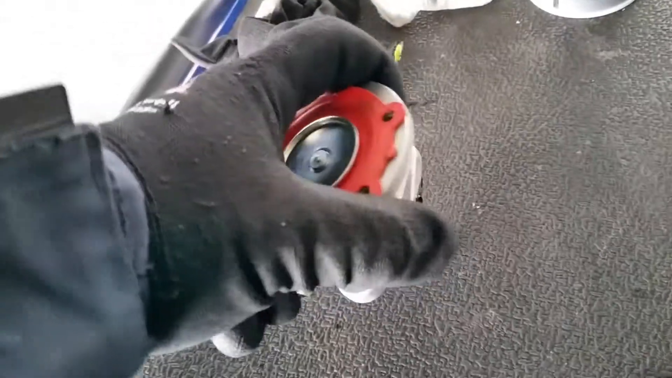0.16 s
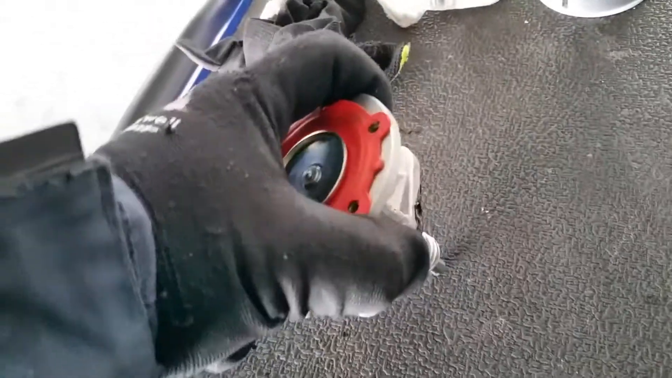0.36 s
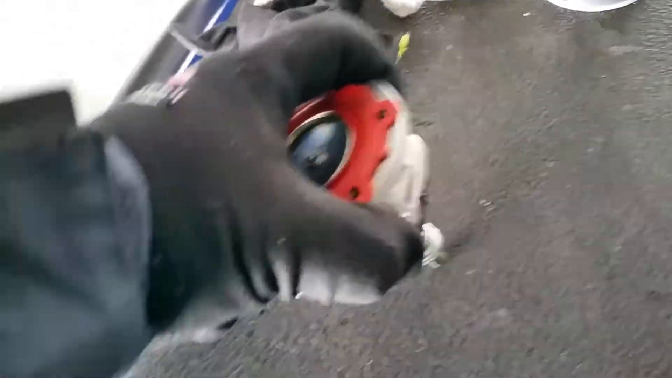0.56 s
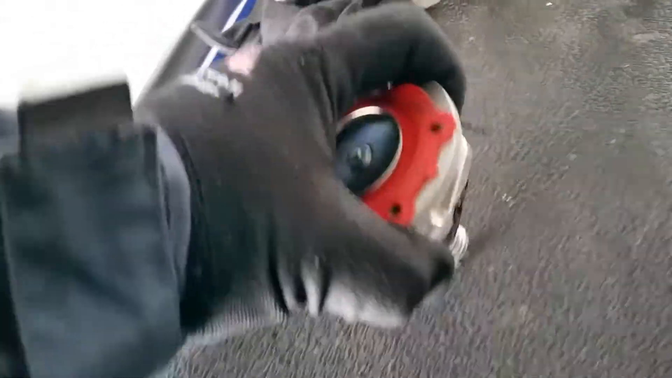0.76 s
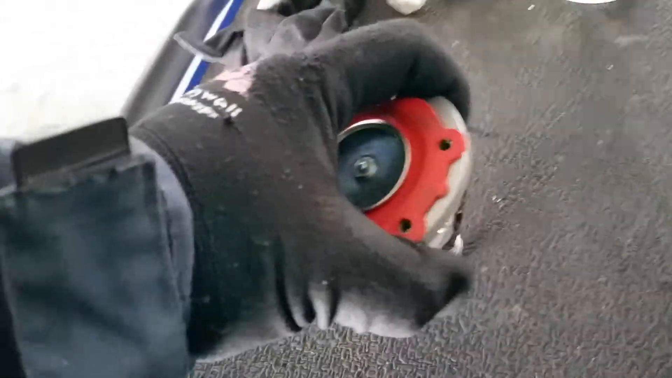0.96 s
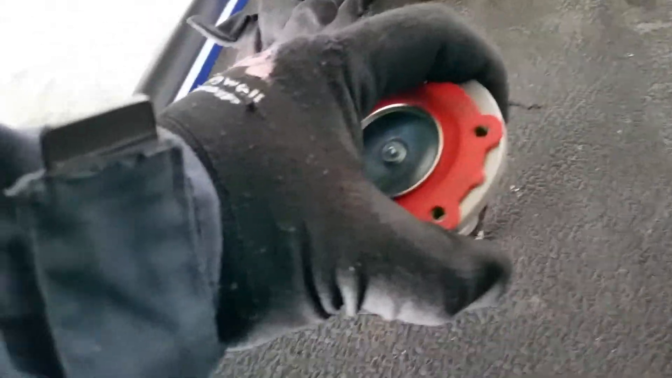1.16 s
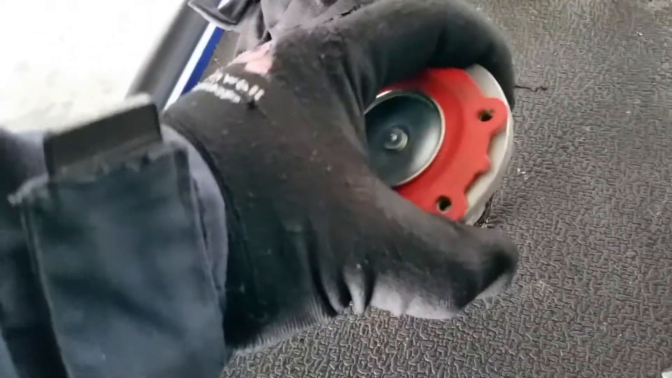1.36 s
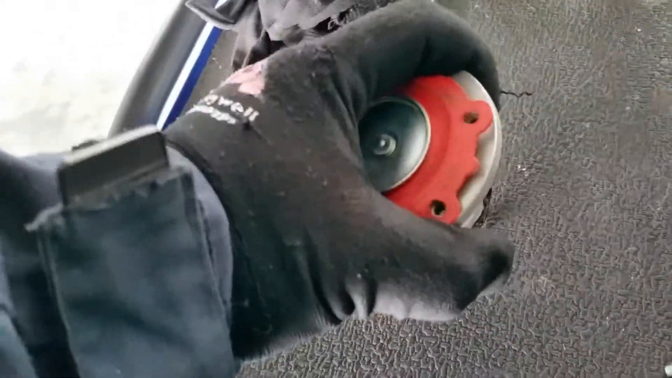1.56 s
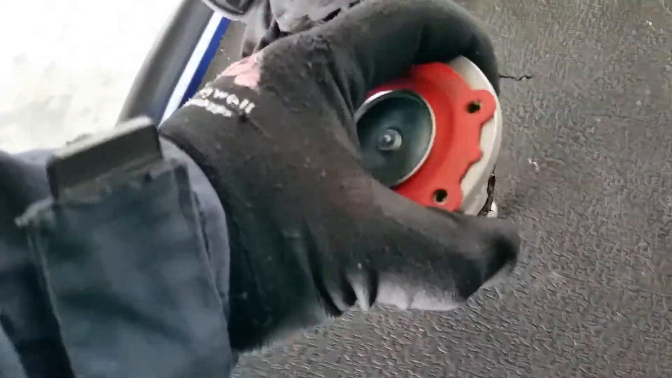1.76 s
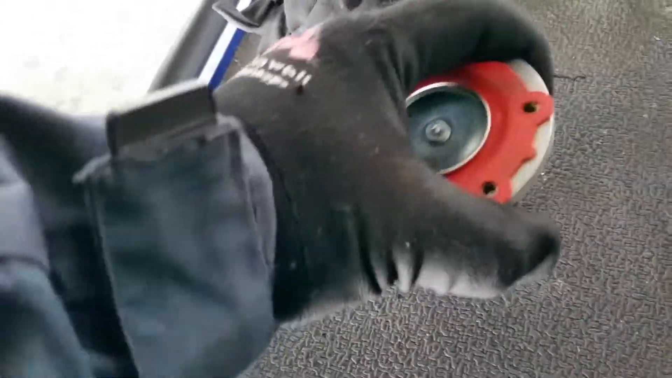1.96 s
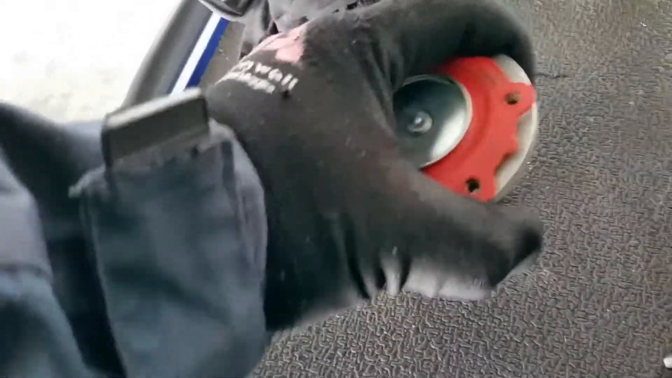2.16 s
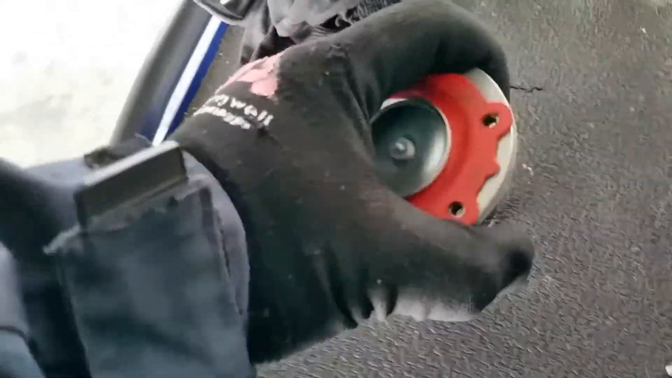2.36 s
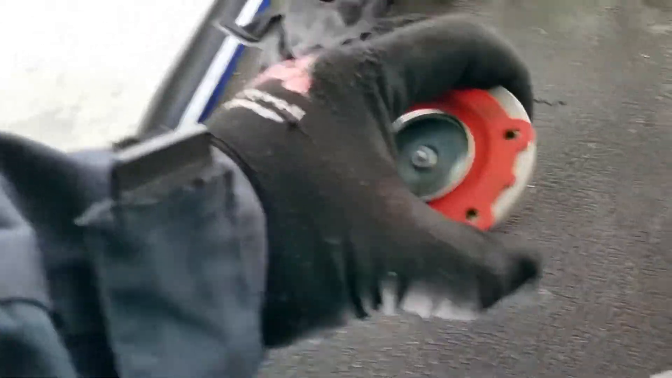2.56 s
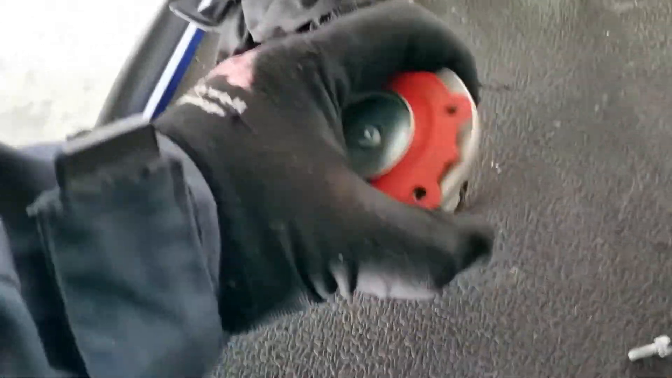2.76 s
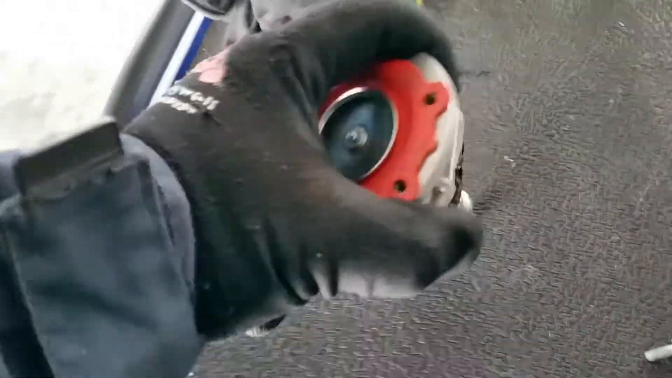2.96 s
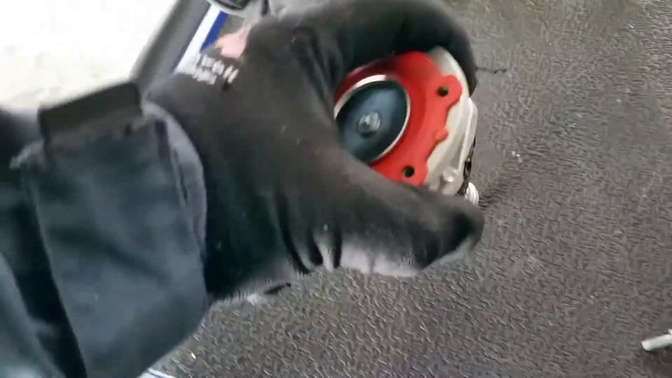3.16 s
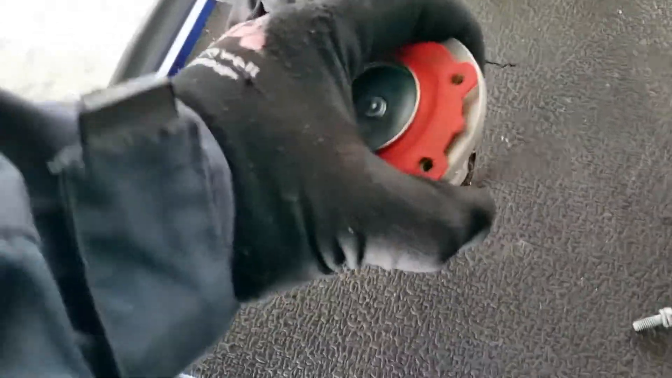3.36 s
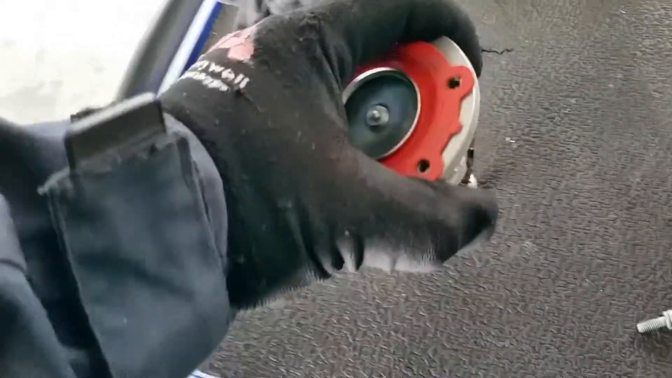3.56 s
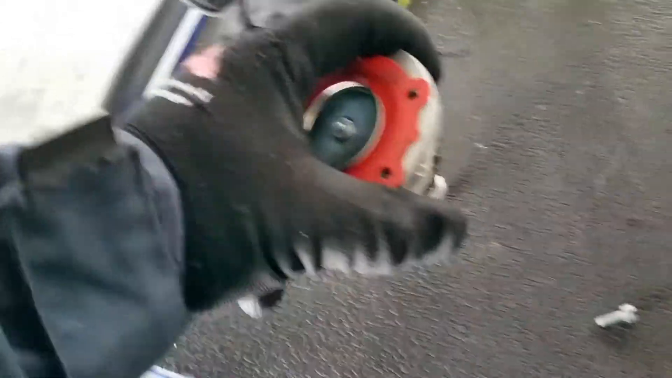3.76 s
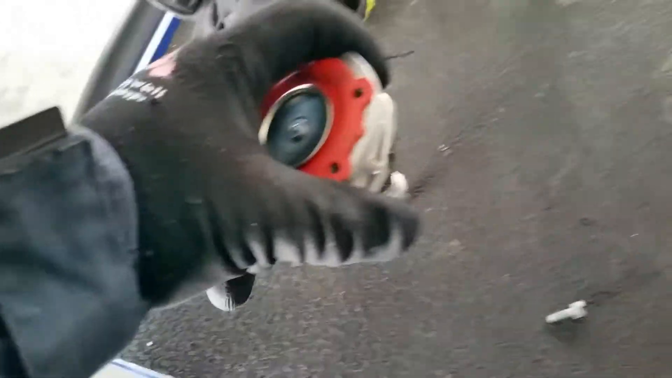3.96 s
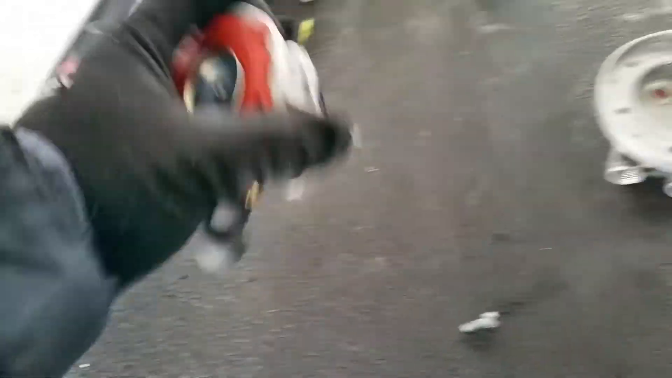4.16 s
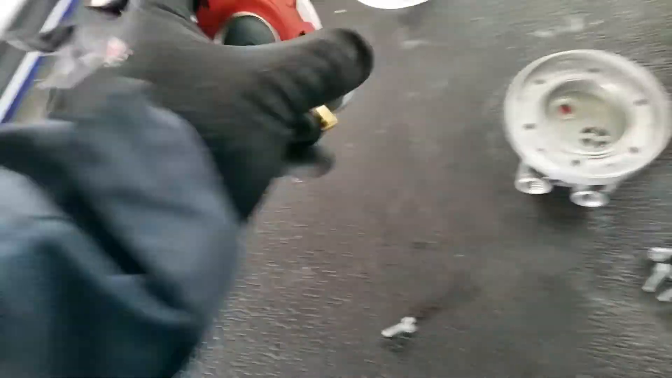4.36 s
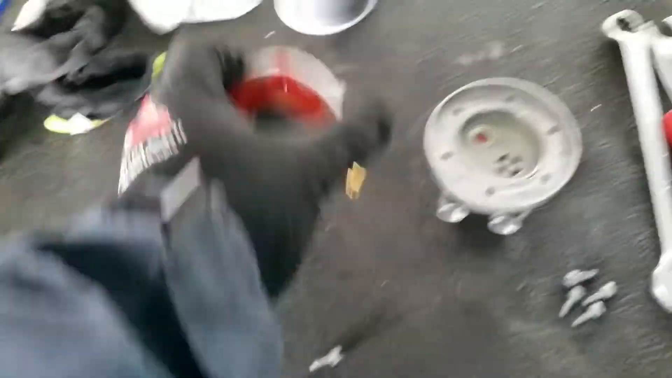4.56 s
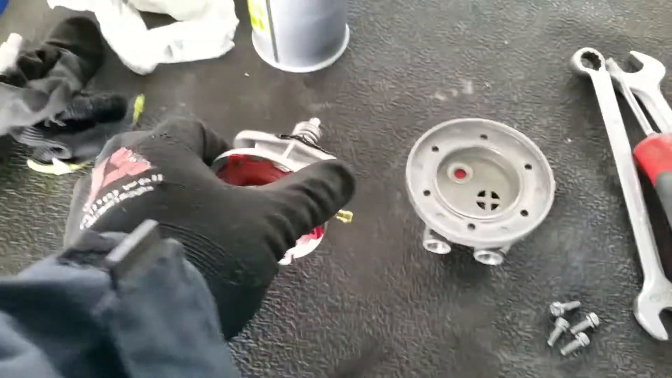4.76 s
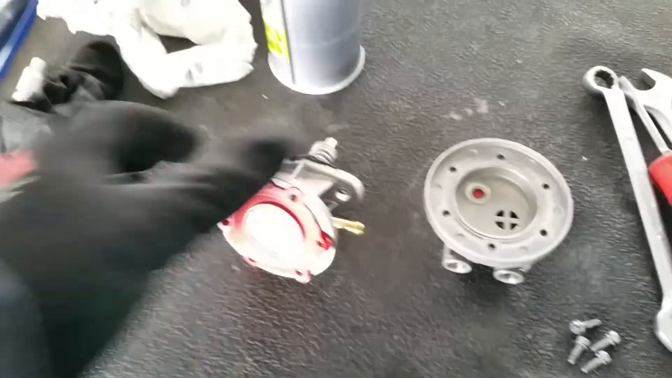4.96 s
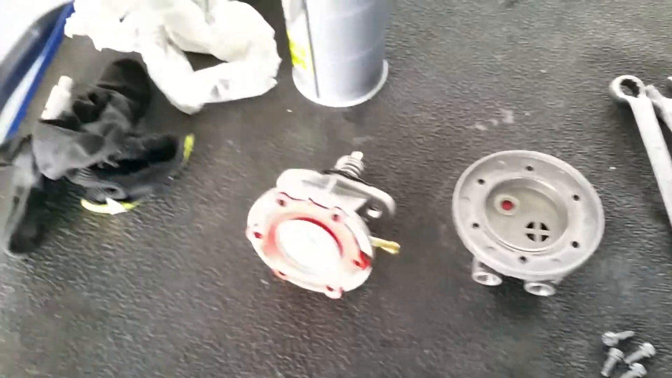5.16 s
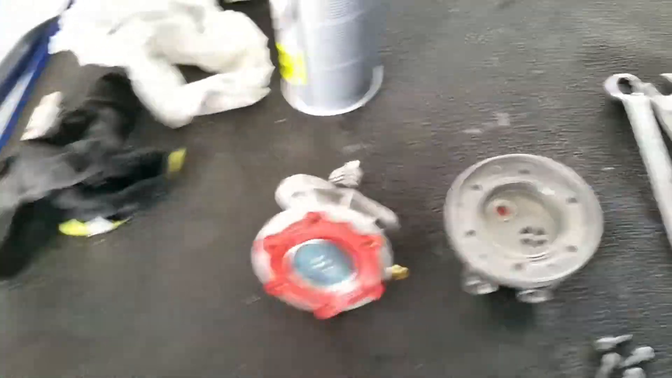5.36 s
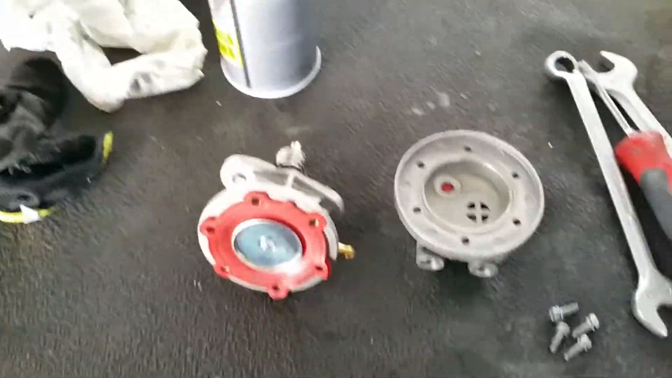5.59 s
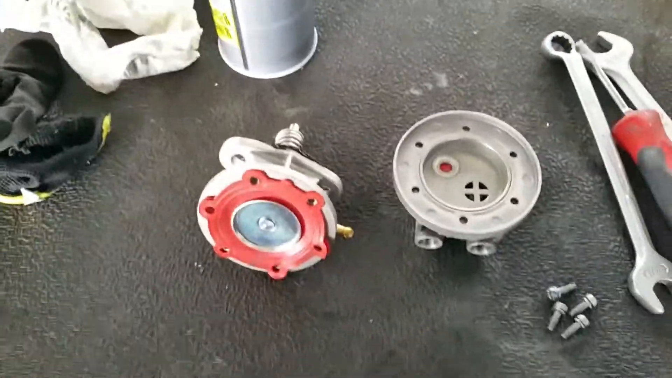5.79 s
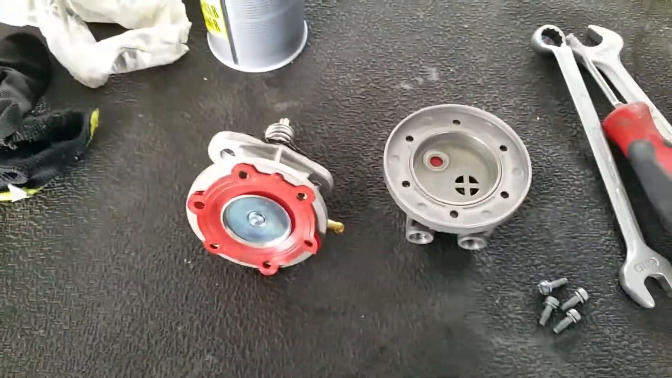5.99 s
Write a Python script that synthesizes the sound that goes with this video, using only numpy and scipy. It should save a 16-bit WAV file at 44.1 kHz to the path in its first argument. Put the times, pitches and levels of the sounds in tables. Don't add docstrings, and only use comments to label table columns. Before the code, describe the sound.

Close nylon sleeve rustle and four dull metallic thumps on a padded bench, then a heavier clunk with clicking parts; an engine idles outside.

```python
import sys
import numpy as np
from scipy import signal
from scipy.fft import rfft, irfft, next_fast_len
from scipy.io import wavfile
from scipy.ndimage import uniform_filter1d

SR = 44100
rng = np.random.default_rng(int(sys.argv[2]) if len(sys.argv) > 2 else 0)


def magnitude_from_level(level_db):
    exponent = np.asarray(level_db, float) / 20
    return 10 ** exponent


def put_to_file(sound):
    columns = np.atleast_2d(sound).T
    safe = np.clip(columns, -1, 1)
    whole_steps = np.round(safe * 32767)
    wavfile.write(sys.argv[1], SR, whole_steps.astype(np.int16))


N = 265778
TIME = np.arange(N) / SR
SIZE = next_fast_len(N)
HZ = np.arange(SIZE // 2 + 1) * SR / SIZE + 1e-3

# f/Hz, likeness/0-1
PORTS_ALIKE = [(30, 0.66), (130, 0.74), (290, 0.77), (640, 0.4), (1410, 0)]


def on_log(table, hz):
    return np.interp(np.log(hz), np.log([p[0] for p in table]), [p[1] for p in table])


def curves(table):
    s, *columns = np.transpose(table)
    return [np.interp(TIME, s, c) for c in columns]


def walk(rate):
    hold = int(SR / rate)
    steps = np.repeat(rng.standard_normal(N // hold + 1), hold)
    return uniform_filter1d(steps, hold)[:N]


def hiss(left, right, alike, flicker_db, rate):
    a, b = rfft(rng.standard_normal((2, SIZE)))
    shared = np.clip(on_log(alike, HZ), 0, 1)
    other = shared * a + np.sqrt(1 - shared ** 2) * b
    inside = (HZ > left[0][0]) & (HZ < left[-1][0])
    pair = np.array([a * magnitude_from_level(on_log(left, HZ)), other * magnitude_from_level(on_log(right, HZ))]) * inside
    out, octave = 0, np.log2(HZ)
    for k in range(int(np.log2(left[0][0])), int(np.log2(left[-1][0])) + 2):
        share = np.cos(np.pi / 2 * np.clip(octave - k, -1, 1)) ** 2
        out = out + irfft(pair * share, SIZE)[:, :N] * magnitude_from_level(flicker_db * walk(rate))
    return out / np.sqrt(np.mean(out ** 2))


def pan(x, db):
    return x * magnitude_from_level(np.array([db / 2, -db / 2]).reshape(2, -1))


def ports(x, lag):
    return np.array([x, np.roll(x, lag)])


def from_bench(x):
    return pan(ports(x, 5), -1.9)


def add(out, sound, s):
    i = int(s * SR)
    n = min(sound.shape[-1], N - i)
    out[..., i:i + n] += sound[..., :n]


def decay(t, t60):
    return np.exp(-np.log(1000) * t / t60)


def swell(start, length):
    share = (TIME - start) / length
    rise = 0.35
    speed = np.clip(np.minimum(share / rise, (1 - share) / (1 - rise)), 0, 1)
    return np.sin(np.pi / 2 * speed) ** 1.07


def ring(modes):
    t = TIME[:SR // 2]
    return sum(magnitude_from_level(db) * decay(t, t60) * np.sin(2 * np.pi * hz * t + round(ahead) * np.pi / 2)
               for hz, db, t60, ahead in modes)


def varied(modes, hz_share, spread_db):
    return [(hz * (1 + hz_share * rng.standard_normal()), db + spread_db * rng.standard_normal(), t60, ahead)
            for hz, db, t60, ahead in modes]


def push(x, contact_s):
    shape = np.hanning(int(contact_s * SR) + 2)
    return signal.fftconvolve(x, shape / shape.sum())[:len(x)]


def tick(db, hz, t60):
    t = TIME[:SR // 4]
    band = signal.butter(2, [hz / 2, min(hz * 2, .45 * SR)], "bandpass", fs=SR, output="sos")
    left, other = rng.standard_normal((2, len(t)))
    alike = np.clip(1 - hz / 2480, 0, 1)
    right = alike * left + np.sqrt(1 - alike ** 2) * other
    return magnitude_from_level(db) * signal.sosfilt(band, np.array([left, right]) * decay(t, t60))


def engine():
    # t/s, firing rate f/Hz, level/dB
    idle = [(0.0, 53.06, -46.5), (1.0, 52.4, -47.5), (1.6, 52.2, -46.5), (1.9, 47.36, -51),
            (2.5, 46.17, -54.5), (3.3, 44.13, -53), (4.0, 44.63, -52), (4.5, 46.12, -57), (5.2, 46.4, -50),
            (6.03, 46.86, -48.5)]
    # f/Hz, level/dB
    exhaust = [(44, -3), (53, 0), (88, -5), (105, -2), (140, -1), (158, -8.5), (200, -16), (320, -14)]
    hz, db = curves(idle)
    turn = 2 * np.pi * np.cumsum(hz * (1 + 0.00755 * walk(12))) / SR
    out = 0
    for k in range(1, 7):
        level = magnitude_from_level(db + on_log(exhaust, k * hz) + 5.0 * walk(11))
        out = out + np.sqrt(2) * level * np.sin(k * turn + rng.uniform(0, 2 * np.pi))
    return ports(out, 17)


def traffic():
    # t/s, low band level/dB,
    # # tyre hiss level/dB
    rumble_and_hiss = [(0.0, -48.5, 0.5), (0.45, -50.5, -3), (0.85, -49.5, 3), (1.4, -45, -0.5), (1.9, -46.5, 4.5),
                       (2.4, -50, 0), (2.85, -50.5, -3), (3.3, -48, 0), (3.9, -50, -2.5), (4.15, -50, 3),
                       (4.8, -41.5, 3), (5.7, -51, 3), (6.03, -50, 0)]
    # f/Hz, level/dB per Hz
    rumble = [(12, -46), (20, -8), (38, -5), (59, -3.5), (76, -2), (101, -1.5), (130, -6), (160, -7),
              (303, -12), (340, -15), (925, -25), (1310, -29.5), (2000, -45.5), (2600, -53), (4400, -120)]
    # f/Hz, level/dB per Hz
    air_left = [(700, -36), (1500, -1.5), (2500, 3), (3300, 1), (4600, 0.5), (5300, -42), (7500, -46),
                (9000, -21.5), (12000, -15), (14700, -3), (15800, -15)]
    air_right = [(700, 9.5), (1500, 5), (2200, 5.5), (3000, 0.5), (4500, -5.5), (5300, -9.5), (7800, -54),
                 (10000, -24), (13000, -9), (15800, 3)]
    rumble_db, air_db = curves(rumble_and_hiss)
    out = magnitude_from_level(rumble_db + 4.5) * hiss(rumble, rumble, PORTS_ALIKE, flicker_db=-2.5, rate=11)
    return out + magnitude_from_level(air_db - 58) * hiss(air_left, air_right, PORTS_ALIKE, flicker_db=2.2, rate=6)


def fan():
    # f/Hz, width/Hz, level/dB, left minus right/dB
    whines = [
        (3944, 670, -63.5, 10),
        (3827, 30, -79, 26.5),
        (14700, 300, -74, 17),
    ]
    out = np.zeros((2, N))
    for hz, width, db, side_db in whines:
        resonance = 1 / (1 + ((HZ - hz) / width * 2) ** 2)
        whine = irfft(rfft(rng.standard_normal((2, SIZE))) * resonance, SIZE)[:, :N]
        out += pan(magnitude_from_level(db) * whine / whine.std(), side_db)
    return out


def grip():
    # start t/s, length/s, level/dB
    shifts = [(0, .25, -44), (.45, 0.18, -44.5), (1.0, 0.37, -52), (1.8, 0.18, -49), (2.305, 0.42, -37),
              (2.8, 0.24, -39), (3.048, 0.23, -37.5), (4.15, 0.3, -52), (5.75, 0.25, -54)]
    # f/Hz, level/dB per Hz
    case = [(20, -10), (60, 5), (110, 2), (200, -17), (400, -36)]
    effort = np.sqrt(sum((magnitude_from_level(db) * swell(start, length)) ** 2 for start, length, db in shifts))
    return effort * hiss(case, case, [(20, 0), (400, 0)], flicker_db=-3.0, rate=27)


def cuff():
    # start t/s, length/s, level/dB, centre f/Hz
    rubs = [(-.2, 0.63, -58, 2140), (.55, 0.67, -68, 2400), (0.846, 0.17, -56, 2400),
            (0.98, 0.1, -55, 2750), (1.25, 0.52, -59, 2190), (1.502, 0.38, -57.5, 2200),
            (1.806, 0.27, -62, 2360), (2.44, 0.32, -60.5, 2240), (3.2, 0.34, -57.5, 2200),
            (3.604, 0.21, -61, 2000), (4.02, 0.64, -56, 2100), (4.25, 0.79, -56, 2240),
            (4.896, 0.63, -51.5, 2190), (5.343, 0.43, -59.5, 2250), (5.62, 0.66, -60, 2130),
            (5.62, 0.58, -62.5, 2750)]
    # share of its centre f, level/dB per Hz
    colour = [(.64, -20), (.84, -10), (1, 0), (1.18, -10), (1.6, -22), (2.05, -9), (2.36, -24)]
    out, noise = 0, rfft(rng.standard_normal((2, SIZE)))
    for start, length, db, hz in rubs:
        inside = (HZ > colour[0][0] * hz) & (HZ < colour[-1][0] * hz)
        drag = irfft(noise * magnitude_from_level(on_log(colour, HZ / hz)) * inside, SIZE)[:, :N]
        out = out + magnitude_from_level(db) * swell(start, length) * drag / drag.std()
    return pan(magnitude_from_level(-2.5 + 1.5 * walk(120) + 1.1 * walk(30)) * out, -8.0)


def sleeve():
    # start t/s, length/s, level/dB, fine fibres over body/dB, left minus right/dB
    strokes = [(-.2, 0.92, -77.5, 18.5, -2.5), (0.496, 0.59, -76.5, 13, -9), (0.805, 0.32, -60, 8, -6),
               (0.944, 0.26, -59.5, -17, -8.5), (1.087, 0.66, -69, -16, -9.5), (1.55, 0.29, -65, 2, -3),
               (1.77, 0.38, -69.5, 13, -7), (1.977, 0.26, -60, -13, -4), (2.17, 0.47, -65.5, 0, -1),
               (2.44, 0.27, -76, 17, -14.5), (3.002, 0.2, -74.5, 18.5, -12),
               (3.2, 0.58, -73.5, 14.5, -11.5), (3.598, 0.28, -69, 15.5, -4.5),
               (3.795, 0.51, -78, 19, -1.5), (4.04, 0.35, -58.5, 8.5, -4), (4.273, 0.52, -49.5, 7.5, -4),
               (4.668, 0.2, -49, -20, -6), (4.759, 0.5, -58, -6, -6), (4.94, 0.43, -53, 10.5, -10.5),
               (5.155, 0.62, -55.5, 12, -6.5), (5.648, 0.44, -66, 3, -1.5)]
    # f/Hz, level/dB per Hz
    rustle_left = [(1200, 2.5), (2500, -0.5), (4200, -1), (5500, -13), (7000, -11), (8500, -2), (9500, 1.5),
                   (11000, -2), (15000, -3), (15900, 5.5)]
    rustle_right = [(1200, -3), (2700, -3.5), (4500, -1.5), (6500, -5), (8000, -12), (9500, -10.5),
                    (11000, -8), (15000, -4), (15900, -1.5)]
    slips = magnitude_from_level(1.6 * walk(60) + 1.3 * walk(14))
    cloth = slips * hiss(rustle_left, rustle_right, PORTS_ALIKE, flicker_db=.9, rate=14)
    fine = signal.sosfilt(signal.butter(2, 11000, "highpass", fs=SR, output="sos"), cloth)
    body = signal.sosfilt(signal.butter(2, 11000, "lowpass", fs=SR, output="sos"), cloth)
    body_power, fine_power = magnitude_from_level(2 * -76.5), magnitude_from_level(2 * -74.5)
    for start, length, db, fine_db, side_db in strokes:
        power = pan(magnitude_from_level(db) * swell(start, length), side_db) ** 2
        body_power = body_power + power
        fine_power = fine_power + magnitude_from_level(2 * fine_db) * power
    return magnitude_from_level(2) * np.sqrt(body_power) * body - np.sqrt(fine_power) * fine


def loose_parts():
    # start t/s, level/dB,
    # centre f/Hz, t60/s, left minus right/dB
    clicks = [(2.402, -39, 1000, 0.018, -6), (2.549, -39, 1490, 0.016, -14), (2.93, -63, 2200, .01, 0),
              (4.7009, -34, 9000, 0.0089, 7), (3.438, -37.5, 1380, 0.016, -7),
              (3.636, -52, 1800, 0.011, -3), (4.889, -50, 8850, 0.0054, -13),
              (5.481, -29.5, 850, 0.022, -4),
              (.5505, -34, 900, .01, 0), (.5505, -41, 2800, .007, -3), (1.061, -44, 3500, .006, -5),
             (4.7004, -19, 1150, .016, 0), (4.7006, -33, 900, .12, 0), (4.73, -23, 480, .45, 0),
             (4.7131, -27, 6500, .014, 5), (4.7131, -28, 4200, .018, -3), (4.7131, -19, 2300, .024, -6),
             (4.7131, -27, 1100, .03, 0), (4.718, -33, 2600, .08, 0), (4.731, -30, 2100, .03, -3),
             (4.744, -38, 1500, .04, -3)]
    out = np.zeros((2, N))
    for s, db, hz, t60, side_db in clicks:
        add(out, pan(tick(db, hz, t60), side_db), s)
    return out


def snaps():
    # t/s, peak level/dB, centre
    # f/Hz, left minus right/dB
    short_cracks = [(1.0604, -50, 6000, -3), (1.4047, -55, 6200, -1), (1.8245, -50, 13000, -7),
                    (2.0368, -44, 13500, 0), (2.2716, -51, 9000, -4), (2.3204, -48, 7500, -5),
                    (2.3204, -45, 14500, -5), (2.5491, -52, 14000, -7), (2.621, -48, 13500, -5),
                    (2.7818, -55, 8000, -2), (2.7818, -50, 14000, -2), (3.581, -52, 14000, -5),
                    (.5515, -47, 1100, -2), (.5515, -47, 3000, -2), (4.7133, -26, 9500, 6),
             (4.7152, -27, 10500, 6), (4.7195, -35, 10000, 5), (4.726, -41, 10500, 5),
             (4.7325, -36, 4500, -2), (4.7325, -43, 10000, 3)]
    out, t = np.zeros((2, N)), TIME[:SR // 20]
    half_width = 2 ** .5
    for s, db, hz, side_db in short_cracks:
        edges = [hz / half_width, min(hz * half_width, .4 * SR)]
        band = signal.butter(2, edges, "bandpass", fs=SR, output="sos")
        crack = signal.sosfilt(band, rng.standard_normal(len(t)) * decay(t, .008))
        add(out, pan(magnitude_from_level(db + 2) * crack / np.abs(crack).max(), side_db), s)
    return out


def squeaks():
    # start t/s, end t/s, f/Hz, level/dB
    tones = [(.65, .76, 1500, -70), (1.30, 1.40, 2120, -68), (1.895, 1.97, 2650, -61),
             (2.01, 2.08, 2655, -62), (2.08, 2.11, 2640, -67), (2.105, 2.225, 2645, -67),
             (1.95, 2.07, 3055, -69), (2.04, 2.22, 3065, -61.5), (2.2, 2.26, 3065, -71),
             (2.27, 2.33, 3065, -72), (2.0, 2.13, 1535, -69), (2.0, 2.09, 2790, -71),
             (1.97, 2.02, 2680, -70), (2.16, 2.26, 1530, -69), (2.23, 2.29, 1730, -73),
             (5.84, 5.95, 1520, -67)]
    out = np.zeros((2, N))
    for start, end, hz, db in tones:
        n = int((end - start) * SR)
        flutter = magnitude_from_level(2.2 * walk(45)[:n])
        turn = 2 * np.pi * np.cumsum(hz * (1 + .004 * walk(40)[:n])) / SR
        add(out, pan(magnitude_from_level(db) * flutter * signal.windows.tukey(n, .45) * np.sin(turn), -18.5), start)
    return out


def knocks():
    # t/s, level/dB, f/Hz, t60/s
    soft_knocks = [(1.06, -37.5, 308, 0.14), (1.255, -40, 260, 0.071), (1.369, -37, 418, 0.044),
                   (1.278, -33, 293, 0.05), (1.311, -30, 256, 0.094), (1.348, -30, 215, 0.051),
                   (1.441, -31, 253, 0.044), (2.401, -31, 497, 0.0091), (2.412, -31, 198, 0.031),
                   (2.5495, -24, 456, 0.012), (3.009, -50, 297, .03), (3.387, -27.5, 400, 0.013),
                   (3.513, -30.5, 337, 0.026), (4.267, -23, 400, 0.011), (5.4802, -21.5, 735, 0.0067),
                   (5.767, -32.5, 404, 0.031),
                   (3.642, -29.5, 188, 0.28), (4.694, -18, 150, .05), (4.736, -16.5, 266, 0.16),
             (4.652, -25.5, 135, 0.073), (4.774, -19.5, 140, .08), (4.824, -23.5, 140, 0.063),
             (4.725, -24, 385, 0.077), (4.845, -33, 370, .1), (4.744, -26, 330, 0.14),
             (4.746, -25, 670, 0.16), (4.775, -27, 730, .06), (4.799, -26, 88, .1),
             (4.835, -34, 710, 0.052), (4.91, -37, 570, .08), (4.965, -38, 560, 0.096),
             (4.959, -34.5, 135, 0.17), (4.871, -26.5, 136.7, 0.32), (4.886, -27, 134, .2),
             (5.439, -22, 137, 0.094), (5.4616, -39, 135, 0.094), (5.468, -27, 124.2, 0.07)]
    out = np.zeros(N)
    for s, db, hz, t60 in soft_knocks:
        add(out, push(ring([(hz, db, t60, 0)]), 0.0016), s)
    return from_bench(out)


def presses():
    # t/s, strength/dB, tick level/dB, rebound after/s, rebound/dB
    strikes = [
        (1.8600, -5, -34, .021, -27),
        (2.4636, -3, -31.5, .0225, -4.5),
        (3.0351, -2, -32.5, .0205, -7.5),
        (3.6184, -2.5, -32.5, .018, -6.5),
    ]
    # f/Hz, level/dB, t60/s, phase/quarter turns ahead
    bench_modes = [(93.3, -20.5, 0.11, 2), (136.5, -24.5, 0.27, 1), (190, -25, 0.25, 0),
                   (263, -32.5, 0.1, 0), (273, -21, 0.04, 0), (400, -28.5, 0.041, 0), (543, -36, 0.072, 0),
                   (632, -27.5, 0.04, 1), (844, -30, 0.04, 2), (915, -27, 0.021, -1)]
    pump_modes = [(1102, -22.5, 0.047, -1), (1317, -26, 0.015, 1), (1460, -25, 0.0079, 1),
                  (2020, -44, 0.0098, 0), (2400, -44, 0.0035, 0), (3050, -32, 0.0008, 0)]
    bench, pump, ticks = np.zeros(N), np.zeros(N), np.zeros((2, N))
    held_db = -31 * np.clip((TIME[:SR // 2] - 0.0093) / 0.0021, 0, 1)
    for s, db, tick_db, later_s, rebound_db in strikes:
        add(bench, magnitude_from_level(db) * push(ring(varied(bench_modes, 0.03, 0.58)), 0.00013), s)
        rebound = push(ring(varied(bench_modes[2:], 0.037, 2.3)), 0.00067)
        add(bench, magnitude_from_level(db + rebound_db) * rebound, s + later_s)
        add(pump, magnitude_from_level(db + held_db) * ring(varied(pump_modes, 0.0037, 2.6)), s)
        add(ticks, tick(tick_db - 18.0, 750, 0.072) + tick(tick_db + 1.5, 380, 0.21), s + later_s)
        add(ticks, pan(tick(tick_db, 1800, 0.01), -13.5), s)
        add(ticks, tick(tick_db + 0.5, 24000, 0.011) + tick(tick_db + 2.5, 1300, 0.014), s)
    return from_bench(bench) + pan(ports(pump, 11), -1.9) + ticks


def setting_down():
    # t/s, strength/dB
    contacts = [
        (4.652, -20),
        (4.7001, 0),
        (4.774, -18),
        (4.824, -20),
    ]
    # f/Hz, level/dB, t60/s, phase/quarter turns ahead
    bench_modes = [(82.6, -18, .21, 1), (139.5, -6, .26, 3), (156.8, -8, .113, 0), (222.9, -15, .128, 2),
                   (270.5, -12, .046, 2), (315, -22, .2, 3), (345, -20, .12, 0), (408, -27, .3, 2),
                   (489, -20, .12, 1), (558, -11.5, .082, 1), (668, -13, .051, 1), (768, -20, .2, 3),
                   (620, -25, .15, 3), (815, -21, .035, 3)]
    # t/s, f/Hz, level/dB, t60/s, phase/quarter turns ahead
    part_ring = [(4.76, 6690, -58, .07, 0), (4.774, 6690, -60, .08, 0), (4.7133, 15500, -44, .12, 0)]
    out = np.zeros(N)
    for s, db in contacts:
        boom = push(ring(varied(bench_modes, -.002 * db, -.2 * db)), .0006 - .00015 * db)
        held_s = .043 if db == 0 else .0225
        settle_db = -25 * np.clip((TIME[:len(boom)] - held_s) / 0.009, 0, 1)
        add(out, magnitude_from_level(db + settle_db) * boom, s)
    for s, *mode in part_ring:
        add(out, ring([mode]), s)
    return from_bench(out)


def shed(x):
    # f/Hz, t60/s, level/dB
    tail_bands = [(152, 0.4, -18), (400, 0.35, -12), (1000, 0.12, -23), (4200, 0.14, -6), (7000, 0.4, -52)]
    t, tail = TIME[:SR // 2], 0
    for hz, t60, db in tail_bands:
        band = signal.butter(2, [hz / 2.82, hz * 1.68], "bandpass", fs=SR, output="sos")
        both, apart = rng.standard_normal(len(t)), rng.standard_normal((2, len(t)))
        noise = signal.sosfilt(band, both + min(hz / 1500, 1.5) * apart)
        tail = tail + magnitude_from_level(db - 29.5) * noise * decay(t, t60) * np.minimum(t / 0.00056, 1)
    return signal.fftconvolve(x, tail, axes=1)[:, :N]


def scene():
    around = engine() + traffic() + fan() + squeaks()
    handling = grip() + cuff() + sleeve() + snaps()
    hits = loose_parts() + knocks() + presses() + setting_down()
    return around + handling + hits + shed(hits)


def drop_faint(x):
    # f/Hz, width/Hz, extra/dB
    faint_spot = (10600, 700, 5)
    faint_db, scatter_db, never_above_db = -4, 4.5, -84
    width = 8
    hz, _, cells = signal.stft(x, SR, nperseg=1024)
    bands = np.abs(cells[:, :-1]).reshape(2, -1, width, cells.shape[-1])
    power = (bands ** 2).mean(axis=2)
    centre = hz[:-1].reshape(-1, width).mean(axis=1)
    treble = (centre > 4500) & (centre < 15850)
    luck = 2 * uniform_filter1d(rng.standard_normal(power.shape), size=4, axis=2)
    spot_hz, spot_width, spot_db = faint_spot
    luck = luck + (spot_db / scatter_db * np.exp(-((centre - spot_hz) / spot_width) ** 2))[:, None]
    usual = np.exp(np.log(power[:, treble] + 1e-20).mean(axis=1, keepdims=True))
    limit = np.minimum(usual * magnitude_from_level(2 * (faint_db + scatter_db * luck)), magnitude_from_level(2 * never_above_db))
    keep = np.where((power < limit) & treble[:, None], .03, 1)
    cells[:, :-1] *= np.repeat(keep, width, axis=1)
    return signal.istft(cells, SR, nperseg=1024)[1][:, :N]


def band_limit(x):
    return signal.sosfilt(signal.butter(12, 15850, fs=SR, output="sos"), x)


def record(dry):
    dry = signal.sosfilt(signal.butter(2, 25, "highpass", fs=SR, output="sos"), dry)
    mix = drop_faint(dry)
    return band_limit(mix)


dry = scene()
out = record(dry)
put_to_file(out)
```